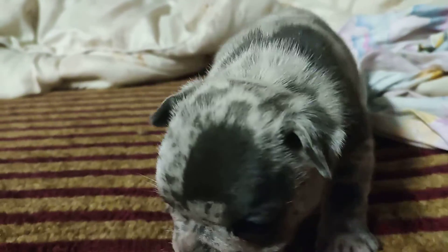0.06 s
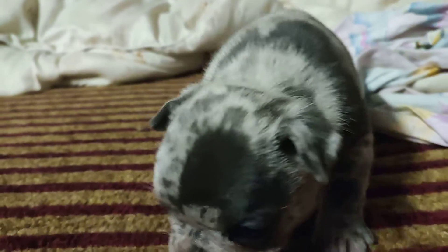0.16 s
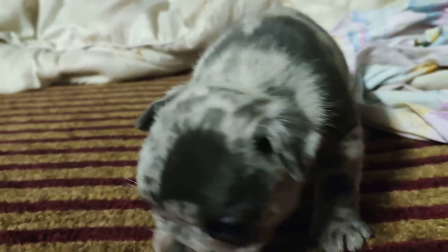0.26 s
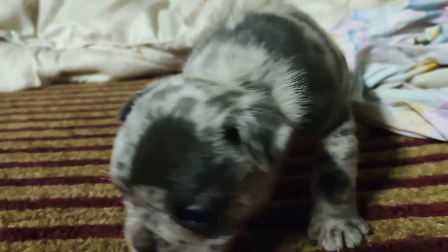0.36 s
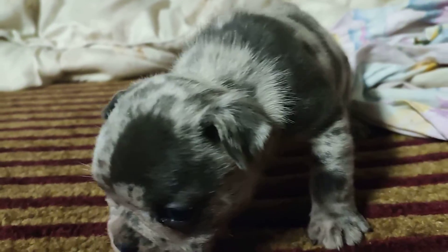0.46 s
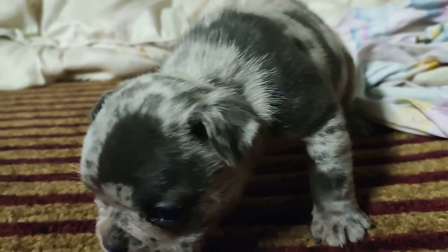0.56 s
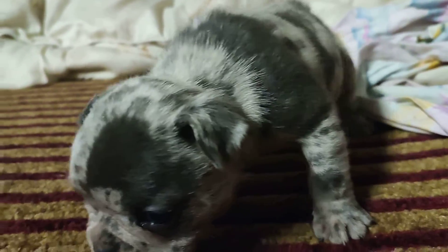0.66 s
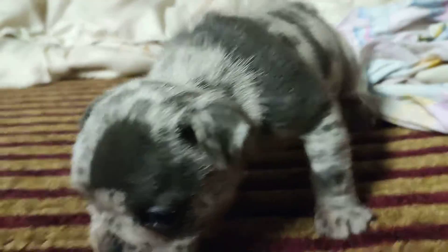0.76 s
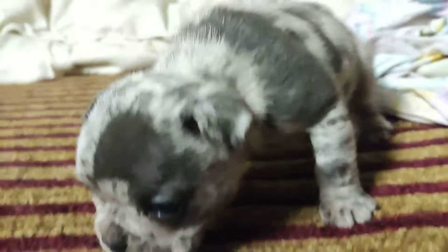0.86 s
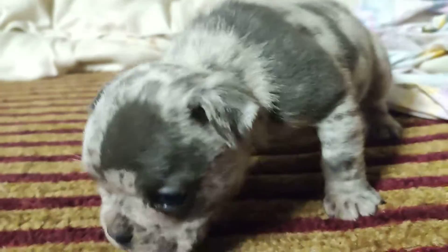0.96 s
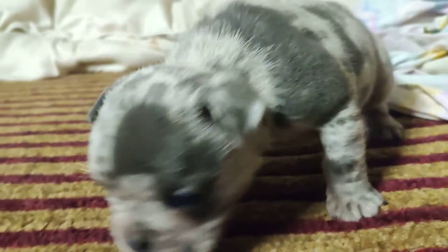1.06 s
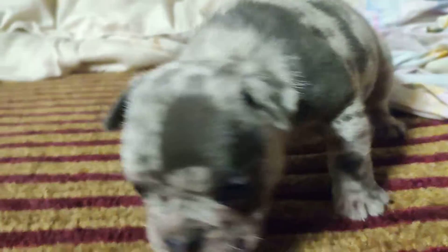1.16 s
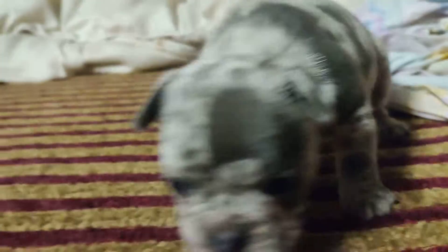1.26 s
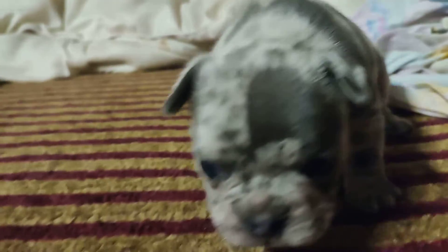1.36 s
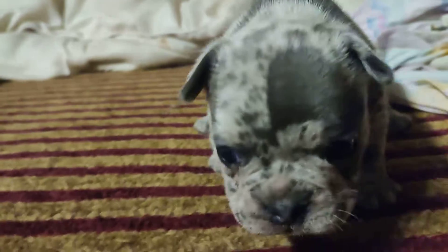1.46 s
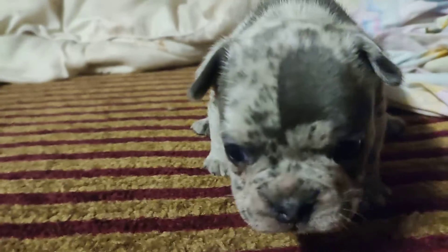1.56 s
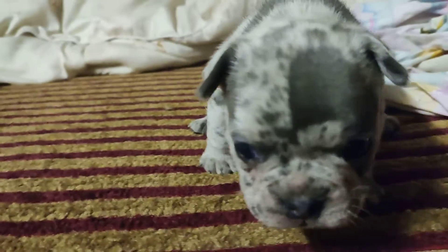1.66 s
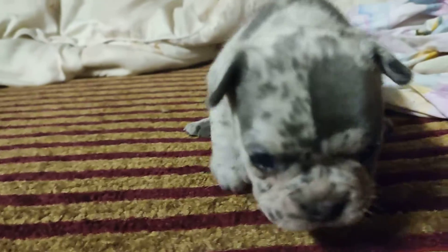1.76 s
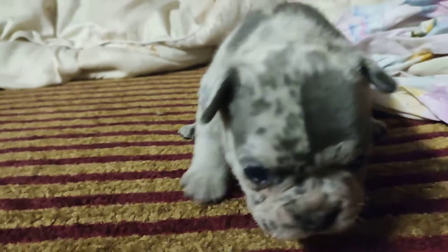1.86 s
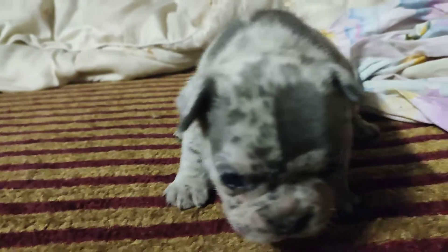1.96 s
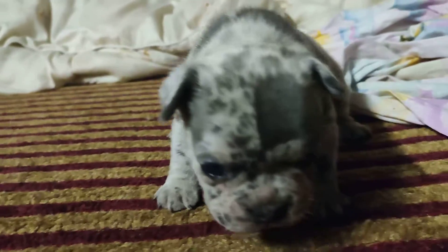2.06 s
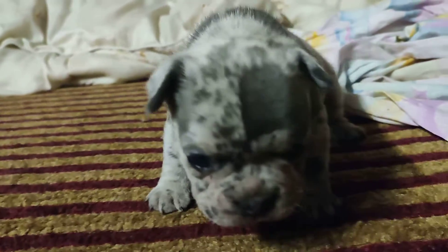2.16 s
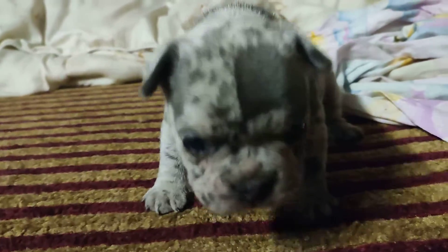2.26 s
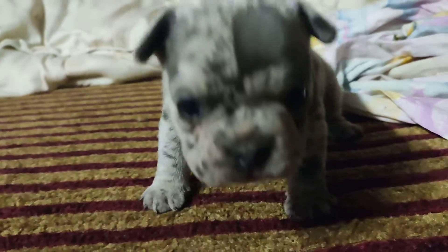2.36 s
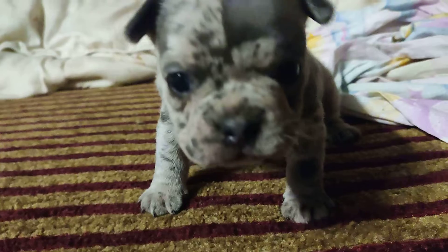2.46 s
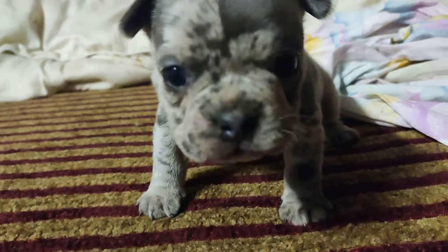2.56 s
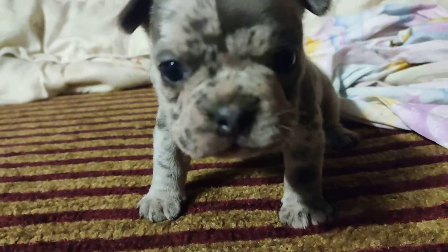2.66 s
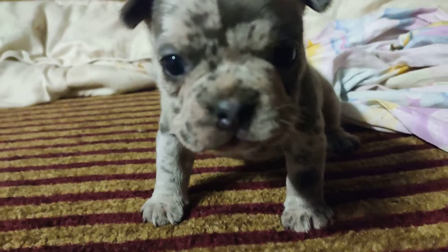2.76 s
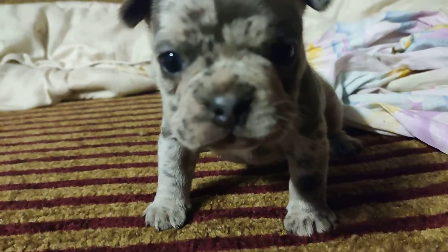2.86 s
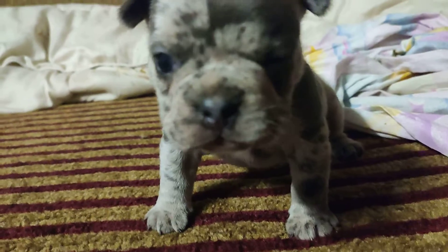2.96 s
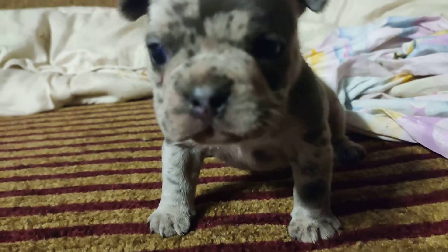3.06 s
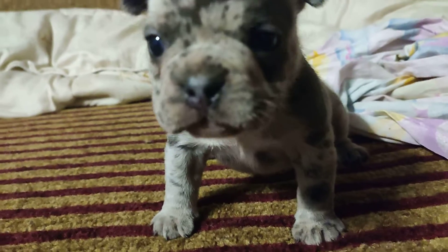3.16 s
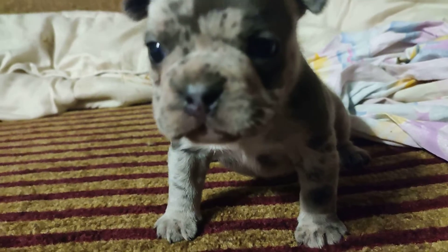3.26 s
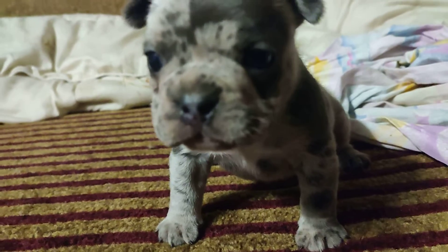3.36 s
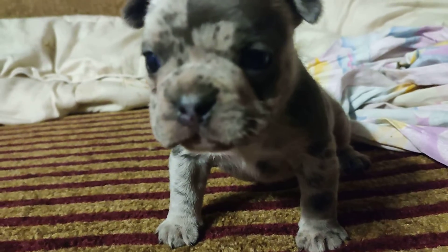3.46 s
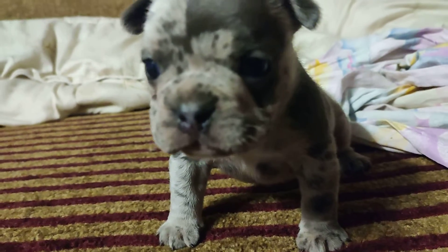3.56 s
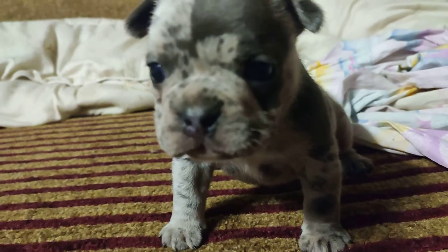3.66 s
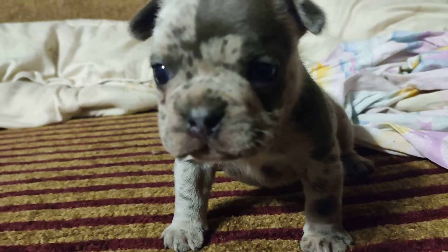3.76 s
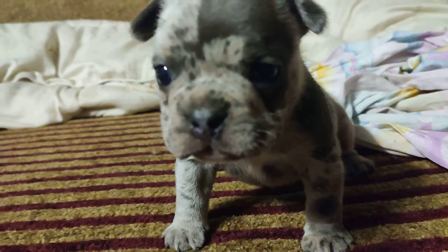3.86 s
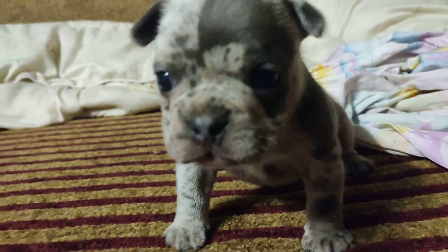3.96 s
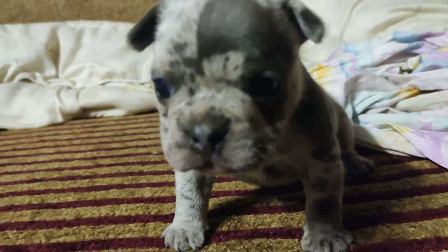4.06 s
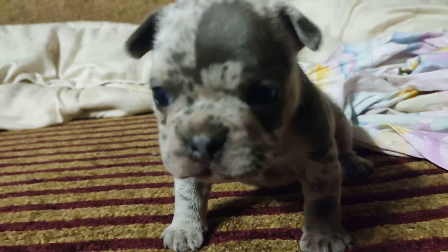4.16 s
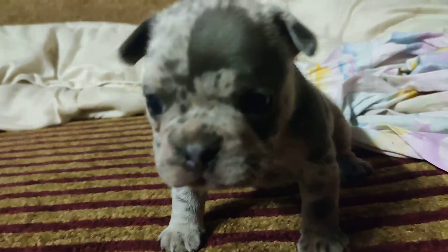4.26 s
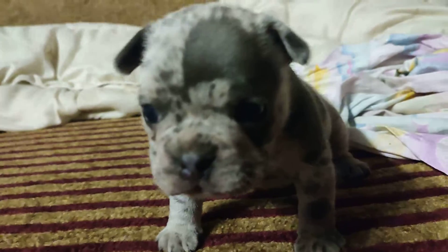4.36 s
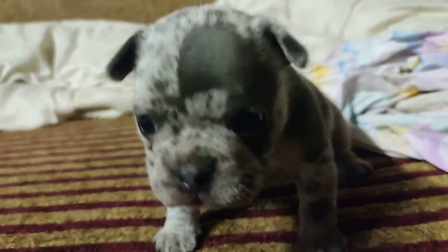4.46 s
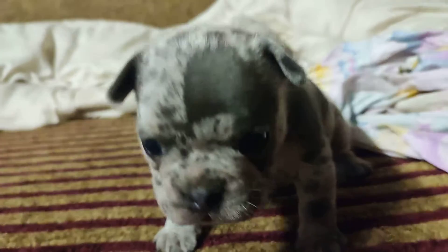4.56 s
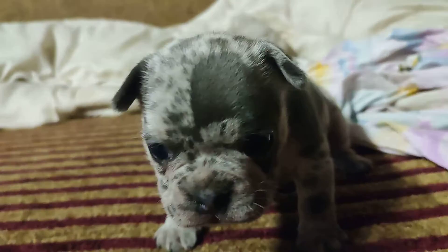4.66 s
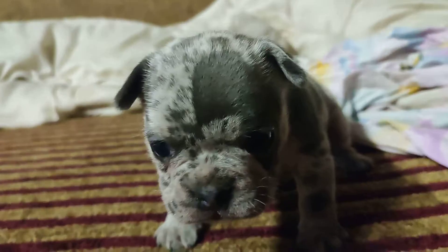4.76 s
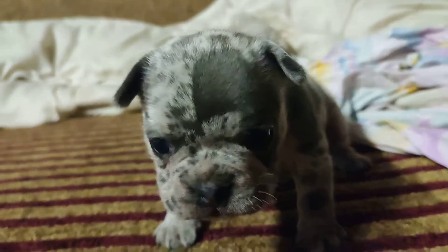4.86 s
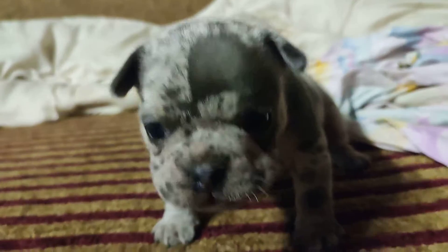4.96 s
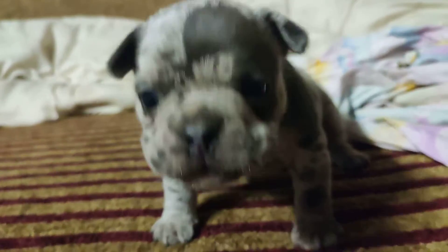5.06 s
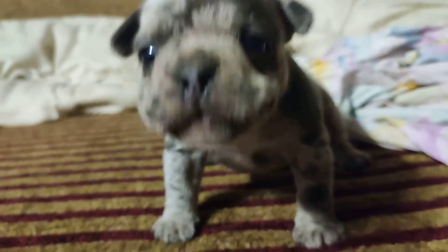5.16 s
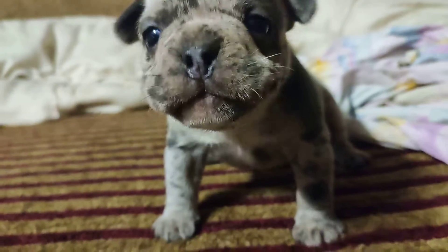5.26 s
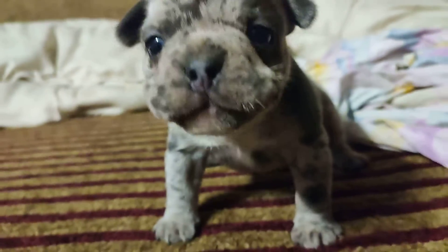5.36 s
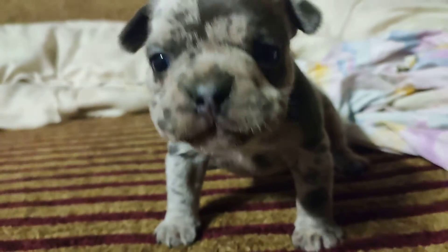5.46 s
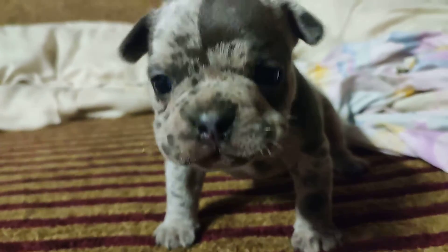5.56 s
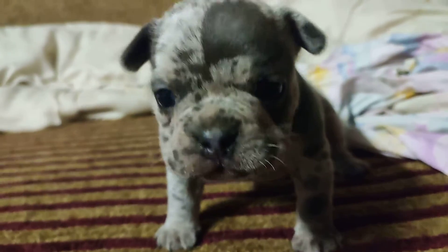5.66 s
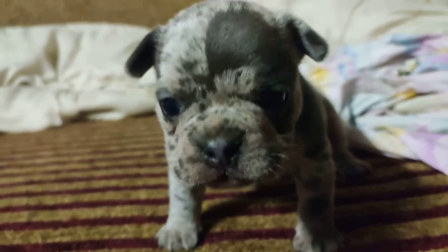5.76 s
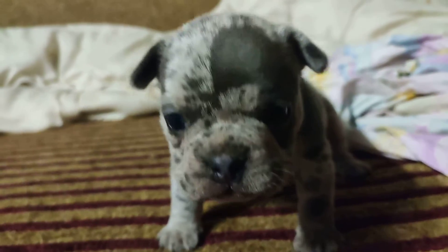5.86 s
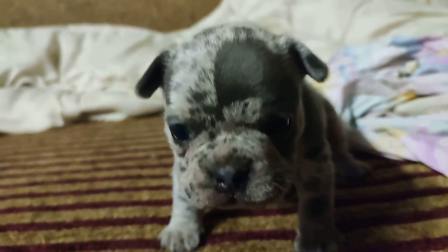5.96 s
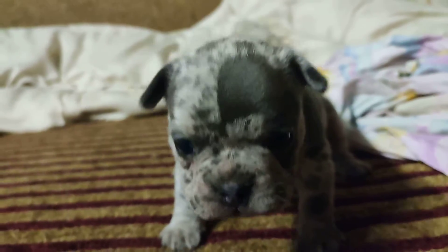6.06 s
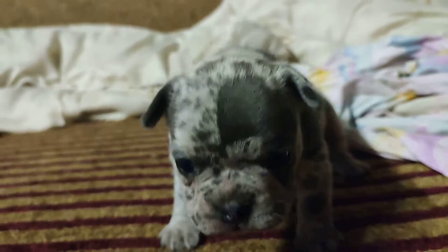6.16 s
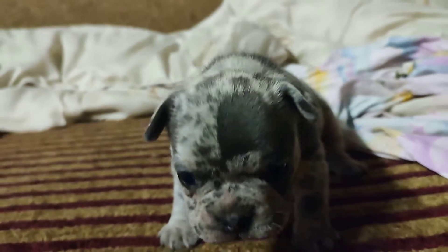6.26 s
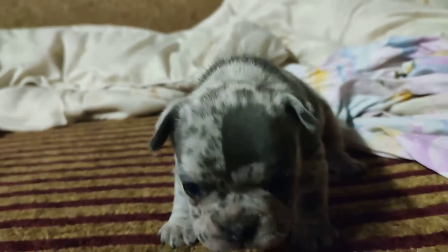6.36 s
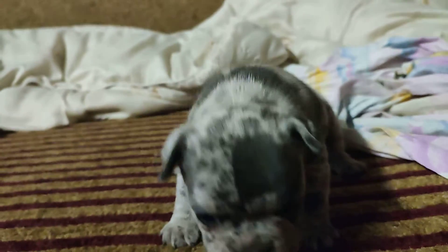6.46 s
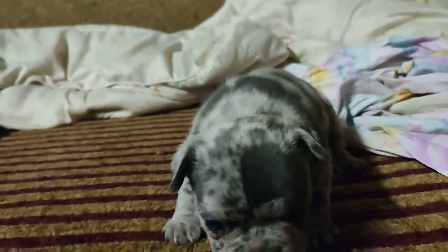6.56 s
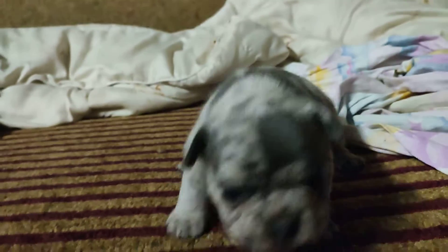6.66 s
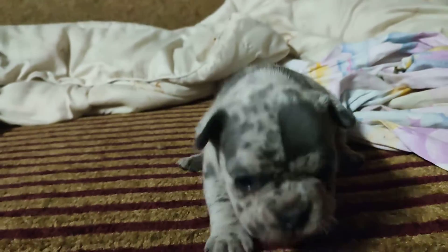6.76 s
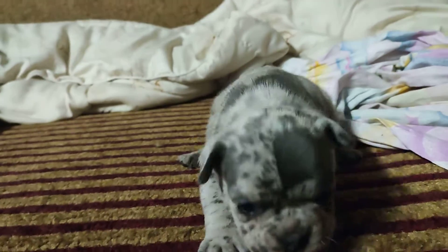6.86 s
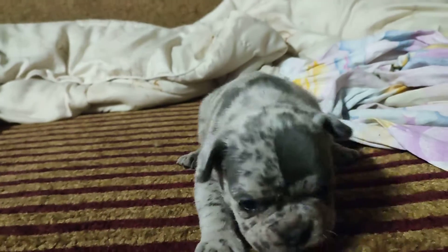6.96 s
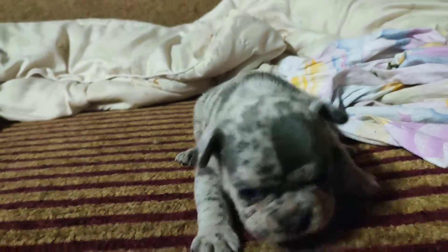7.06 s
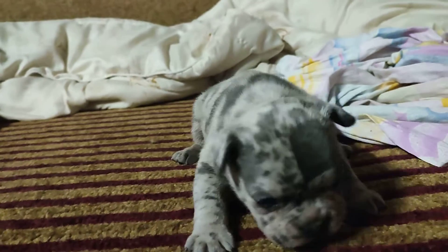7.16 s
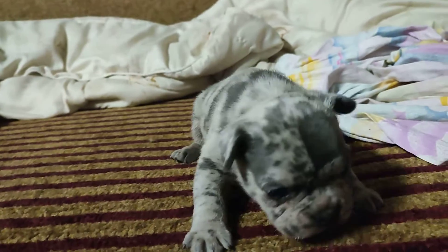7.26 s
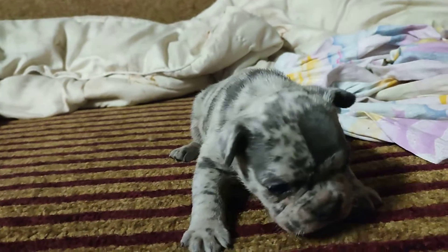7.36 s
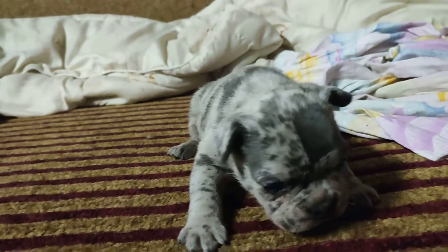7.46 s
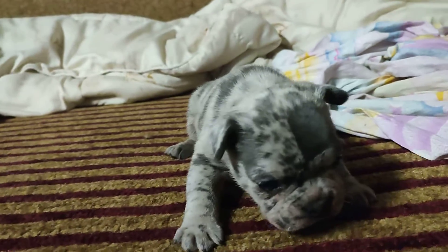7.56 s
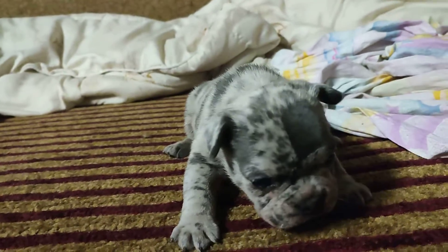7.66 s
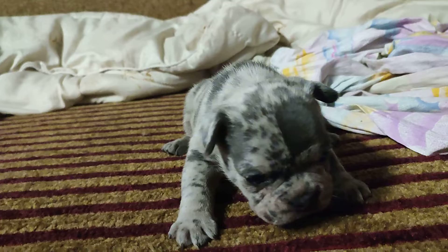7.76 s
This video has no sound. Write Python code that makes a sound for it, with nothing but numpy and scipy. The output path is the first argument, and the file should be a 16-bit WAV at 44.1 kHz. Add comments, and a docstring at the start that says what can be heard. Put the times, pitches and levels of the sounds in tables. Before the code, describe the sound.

A very young puppy is heard close up on a bed, in a quiet room with almost no echo. Faint hiss, low rumble and a slight hum run throughout. For the first two seconds it snuffles softly and makes tiny, short grunts. From about 2.5 to 3.2 seconds come a few brief squeaky yaps mixed with grunts and sniffs, then faint breaths and a tiny lip smack. Near 4.8 seconds a low creak rises into a long, loud squeal, peaking around 5.2 and sliding down to a raspy end by 5.7. At about 6.7 seconds a second cry, louder and shriller, leaps up, holds with a rasp, then falls away by 7.3. A small grunt and sniff follow at 7.5. Soft puffs of air thump the microphone on the right now and then, most densely between 6.2 and 6.6 seconds.

```python
"""Young puppy on a bed.

A very young puppy snuffles, grunts and gives two long squeaky cries close to a two-port microphone.
The voice is vocal fold pulses shaped by throat and mouth; snuffles are air noise in the nose.
Puffs of air thump on the right port over room hiss, a low rumble and a faint hum."""
import sys
import numpy as np
from scipy import signal
from scipy.fft import rfft, irfft
from scipy.io import wavfile
from scipy.ndimage import uniform_filter1d

SR = 44100
rng = np.random.default_rng(int(sys.argv[2]) if len(sys.argv) > 2 else 0)


def to_wav(s):
    """Save 16-bit WAV."""
    ch = np.atleast_2d(s).T  # columns
    pcm = np.round(np.clip(ch, -1, 1) * 32767)  # PCM
    wavfile.write(sys.argv[1], SR, pcm.astype(np.int16))


N = 344421
AIR_LEAK = 0.5  # thin hiss that always passes the folds


def gain_of(db):
    """Decibels to amplitude factor."""
    return 10 ** (np.asarray(db) / 20)


def unit_rms(x):
    """Scale to rms 1."""
    return x / np.sqrt(np.mean(x ** 2) + 1e-20)


def along(rows, t):
    """Interpolate each column of a curve at times t."""
    times_s, *columns = np.transpose(rows)
    return [np.interp(t, times_s, column) for column in columns]


def add(mix, start_s, sound):
    """Mix a sound in at start_s."""
    part = mix[..., round(start_s * SR):][..., :sound.shape[-1]]
    part += sound[..., :part.shape[-1]]


def coloured(x, spectrum, size=4096):
    """Minimum-phase filter from rows of freq_hz, gain_db."""
    freq_hz, gain_db = np.transpose(spectrum)
    bins_hz = abs(np.fft.fftfreq(size, 1 / SR))
    log_gain = np.interp(np.log(bins_hz + 1), np.log(freq_hz + 1), gain_db) * np.log(10) / 20
    phase = -signal.hilbert(log_gain).imag
    taps = np.fft.ifft(np.exp(log_gain + 1j * phase)).real[:size // 2]
    return signal.oaconvolve(x, taps)[:len(x)]


def filtered(x, edge_hz, kind="low", order=2):
    """Zero-phase Butterworth filter."""
    return signal.sosfiltfilt(signal.butter(order, edge_hz, kind, fs=SR, output="sos"), x)


def wobble(count, rate_hz):
    """Smooth random drift, rms 1."""
    spectrum = rfft(signal.detrend(rng.standard_normal(count), type="constant"))
    bins_hz = np.fft.rfftfreq(count, 1 / SR)
    return unit_rms(irfft(spectrum / (1 + (bins_hz / rate_hz) ** 2), count))


def background():
    """Independent hiss at each port, a lumpy, partly shared rumble and a wavering hum."""
    # freq_hz, gain_db
    hiss_colour = [(150, -25), (250, -4), (550, -5.5), (1400, -16), (2500, -10.5), (8500, -27),
                   (9500, -24.5), (14000, -25.5)]
    # freq_hz, gain_db
    rumble_colour = [(8.8, -39.5), (15, 9.5), (27, -1), (46, -6), (151, -21), (300, -32.5), (390, -52.5),
                     (660, -120)]
    # time_s, level_db
    rumble_curve = [(0.0, -55.5), (2.2, -54.5), (2.8, -60.5), (4.1, -55.5), (7.81, -50)]
    # pitch_hz, waver_hz, level_db
    hum_tones = [(201, 12, -75)]
    t = np.arange(N) / SR

    def noise(colour, waver_db, waver_hz):
        return unit_rms(coloured(rng.standard_normal(N), colour)) * gain_of(waver_db * wobble(N, waver_hz))

    hiss = gain_of(-71) * np.array([noise(hiss_colour, waver_db=0.62, waver_hz=2) for _ in range(2)])
    left, shared = (noise(rumble_colour, waver_db=3, waver_hz=30) for _ in range(2))
    rumble = gain_of(along(rumble_curve, t)[0]) * np.array([0.5 * left + 0.15 * shared, 1.62 * shared])
    hum = np.zeros(N)
    for pitch_hz, waver_hz, level_db in hum_tones:
        level = gain_of(level_db + 7.2 * wobble(N, waver_hz))
        hum += level * np.sin(2 * np.pi * pitch_hz * t + 1.3 * wobble(N, waver_hz))
    return hiss + rumble + hum


def mouth_opening(x, treble_db):
    """An open mouth lets out more treble."""
    low = filtered(x, edge_hz=3300, order=4)
    return low + gain_of(treble_db) * (x - low)


def at_ports(x, start_s):
    """Sound reaches the left port first; head direction sets balance and one delay per sound."""
    # time_s, left_lead_s, left_gain_db
    head = [(0, 0.00033, -3), (1.3, 0.00032, -1), (2.5, 0.00024, -2), (5.75, 0.00021, 4.5),
            (6.6, 0.00003, -1), (6.9, 0.000044, 6), (6.95, 0.00013, -1.5)]
    x = np.pad(x, (0, 64))
    lead_s, left_db = along(head, start_s + np.arange(len(x)) / SR)
    delay = np.exp(-2j * np.pi * np.fft.rfftfreq(len(x), 1 / SR) * lead_s.mean())
    return np.array([x * gain_of(left_db), irfft(rfft(x) * delay, len(x))])


def snuffles():
    """Air hisses through the nostrils; wet lips part with tiny smacks."""
    # start_s, length_s, relative_db
    breaths = [(0.024, 0.075, -65), (0.735, 0.14, -66), (0.929, 0.1, -61.5), (1.122, 0.11, -62),
               (1.741, 0.11, -63), (2.51, 0.039, -70), (2.759, 0.15, -52.5), (3.086, 0.16, -63.5),
               (3.466, 0.14, -69), (3.755, 0.23, -69), (7.453, 0.14, -69)]
    # start_s, relative_db
    lip_partings = [(0.1933, -69), (2.9545, -71.5), (4.0526, -71.5)]
    # freq_hz, gain_db
    nose = [(8500, -1), (11500, 16.5), (14000, -6)]
    # freq_hz, gain_db
    lips = [(2300, -9), (3500, 33), (5300, 28), (6500, 14)]
    rise_s, fade_s = 0.0004, 0.0022
    out, t = np.zeros((2, N)), np.arange(900) / SR
    snap = np.minimum(t / rise_s, 1) * np.exp(-t / fade_s)
    puffs = [(s, gain_of(db) * np.hanning(round(length_s * SR)), nose) for s, length_s, db in breaths]
    smacks = [(s, gain_of(db) * snap, lips) for s, db in lip_partings]
    for start_s, envelope, colour in puffs + smacks:
        air = gain_of(19) * envelope * coloured(rng.standard_normal(len(envelope)), colour)
        add(out, start_s, at_ports(mouth_opening(air, treble_db=16.7), start_s))
    return out


def bedroom_tail(x):
    """Bedding soaks up sound, leaving a short tail of sparse reflections."""
    rt60_s = 0.025
    taps = np.zeros((2, 12000))
    delays = np.arange(120, 11980, 20) + rng.integers(0, 20, (2, 593))
    np.put_along_axis(taps, delays, rng.choice([-1., 1.], delays.shape), 1)
    taps *= gain_of(-60 * np.arange(taps.shape[1]) / SR / rt60_s)
    return signal.oaconvolve(x, taps / np.linalg.norm(taps[0]), axes=1)[:, :N]


def thumps():
    """Air hits the right port: a pressure step, then the membrane swings back and settles."""
    # start_s, relative_db, swing_hz
    puffs = [(0.496, -38.5, 91), (0.698, -41.5, 71), (1.279, -40.5, 74.4), (2.219, -41, 82),
             (4.053, -37.5, 64), (4.634, -35, 66.4), (5.154, -39, 45), (6.181, -42.5, 75),
             (6.329, -35.5, 69), (6.491, -35.5, 75), (6.567, -34.5, 60.5), (6.637, -40, 90),
             (7.376, -46, 91)]
    out, t = np.zeros(N), np.arange(3000) / SR
    step = 0.5 * np.exp(-t / 0.0019) * np.minimum(t / 0.00045, 1)
    for start_s, relative_db, swing_hz in puffs:
        swing = 4.6 * np.sin(2 * np.pi * swing_hz * t) * np.exp(-t * swing_hz * 2.3)
        add(out, start_s, -gain_of(relative_db) * (step + swing))
    return out * np.array([[0.08], [1.5]])


def vocal_folds(pitch_hz, rough, flutter=0, cycles=1, leak=AIR_LEAK):
    """Fold pulses. Roughness shakes timing and strength and leaks air; flutter bunches every few."""
    count, top_hz = len(pitch_hz), 15000
    swell_db, swell_range_hz = 4, (4, 14)
    t = np.arange(count) / SR
    turns_per_sample = pitch_hz * np.exp(0.26 * rough * wobble(count, 110)) / SR
    flutter_rad = 2 * np.pi * np.cumsum(turns_per_sample / cycles * np.exp(0.08 * wobble(count, 40)))
    turns = rng.random() + np.cumsum(turns_per_sample)
    bunched = turns + 0.11 * flutter * np.sin(flutter_rad)  # stressed cycles run faster
    draws = rng.random((200, 2))
    pulses = np.zeros(count)
    for k in range(1, int(top_hz / pitch_hz.min())):
        swell_hz = np.interp(draws[k, 0], (0, 1), swell_range_hz)
        swell = (k > 2) * np.sin(2 * np.pi * (swell_hz * t + draws[k, 1]))  # each overtone on its own
        pulses += np.cos(2 * np.pi * k * bunched) * (k * pitch_hz < top_hz) * gain_of(swell_db * swell)
    pulses *= np.sqrt(2 * pitch_hz / 500) * np.exp(0.9 * rough * wobble(count, 130))
    air = (0.84 + 2 * np.exp(-(turns % 1) / 0.75)) * rng.standard_normal(count)
    stress = np.exp(flutter * np.cos(flutter_rad)) / np.sqrt(np.i0(2 * flutter))
    return (pulses + rough * air + leak * np.diff(air, prepend=0)) * stress


def chest_tone(x, share):
    """Add the low chest tone; a negative share thins it."""
    return x + share * filtered(x, edge_hz=550)


def grunts():
    """Short grunts and squeaky yaps; the chest tone drops out while the head is raised."""
    # start_s, length_s, effort_db, start_hz, end_hz, roughness
    pushes = [(0.787, 0.017, -45.5, 352, 383, 0.39), (0.97, 0.025, -43.5, 373, 360, 0.24),
              (1.161, 0.033, -45, 292, 323, 0.31), (1.38, 0.024, -52, 1706, 2030, 0.34),
              (1.8, 0.014, -47, 480, 463, 0.45), (2.506, 0.021, -37, 1037, 942, 0.1),
              (2.796, 0.05, -38.5, 1333, 978, 0.44), (2.835, 0.045, -34.5, 362.6, 343, 0.3),
              (3.133, 0.015, -34.5, 1395, 1230, 0.28), (3.146, 0.011, -33.5, 1486, 1165, 0.32),
              (3.161, 0.011, -32.5, 1454, 1310, 0.06), (3.167, .032, -40.5, 435, 301, 0.49),
              (3.52, 0.015, -48, 355, 329, 0.39), (3.886, 0.029, -50.5, 455, 428, 0.56),
              (6.641, 0.0085, -43, 1330, 1260, 0.32), (7.514, 0.025, -51, 503, 476, 0.42)]
    # freq_hz, gain_db
    grunt_colour = [(1000, 6.5), (1900, -4.5), (2800, 10), (3700, -8.5), (5000, -11), (6000, 0)]
    attack_s, head_up_s, head_down_s = 0.0021, 2.4, 3.4
    out = np.zeros((2, N))
    for start_s, length_s, effort_db, start_hz, end_hz, rough in pushes:
        progress = np.linspace(0, 1, round(length_s * SR))
        attack = np.minimum(progress * length_s / attack_s, 1)
        fade = np.sqrt(1 - progress ** 0.64) * np.minimum((1 - progress) * 3.2, 1)
        pitch_hz = start_hz + (end_hz - start_hz) * progress
        voice = vocal_folds(pitch_hz, rough) * gain_of(effort_db) * attack * fade
        voice = chest_tone(voice, -0.85 if head_up_s < start_s < head_down_s else 2.2)
        add(out, start_s, at_ports(coloured(voice, grunt_colour), start_s))
    return out


def creak(end_s, end_db, length_s):
    """Low creak rising into a cry, as rows of time_s, pitch_hz, effort_db."""
    low_hz, high_hz, start_db = 80.5, 263.2, -45.5
    progress = np.arange(8) / 8
    rise = np.sin(np.pi / 2 * progress)
    pitch_hz = low_hz * (high_hz / low_hz) ** rise
    effort_db = start_db + (end_db - start_db) * rise
    return list(zip(end_s - length_s * (1 - progress), pitch_hz, effort_db))


def voice_breaks(t):
    """The voice breaks into a rasp: roughness, flutter, cycles per flutter and jolt at times t."""
    # start_s, length_s, roughness, flutter_depth, cycles_per_flutter, jolt_db
    rasps = [(5.545, .075, .16, .8, 2, 0), (5.648, .015, .3, .7, 2, 0), (6.715, .202, .1, .65, 5, 8)]
    clear_rough, edge_s, jolt_s = 0.028, 0.012, 0.0035
    rough, flutter, cycles, jolt_db = clear_rough, 0, 1, 0
    for start_s, length_s, rasp_rough, depth, rasp_cycles, size_db in rasps:
        inside = np.clip(np.minimum(t - start_s, start_s + length_s - t) / edge_s + 0.5, 0, 1)
        rough += (rasp_rough - clear_rough) * inside
        flutter += depth * inside
        cycles = np.where(inside > 0, rasp_cycles, cycles)
        age = (t - start_s) / jolt_s - 0.5
        jolt_db += size_db * (np.exp(-age ** 2) - 2 * np.exp(-(age - 2) ** 2))  # jolt, then catch
    return rough, flutter, cycles, jolt_db


def cries():
    """Two squeals rise and fall; the mouth opens with pitch and half closes in a rasp."""
    # per cry: time_s, pitch_hz, effort_db
    cry_curves = [
        [(4.966, 535, -34.5), (5.034, 713, -34.5), (5.09, 773, -28.5), (5.145, 883, -22.5), (5.18, 1096, -20.5),
         (5.22, 1230, -18), (5.26, 1113, -22), (5.288, 872, -21.5), (5.315, 797, -22.5), (5.41, 680, -23.5),
         (5.5, 594.7, -27), (5.592, 433, -30), (5.648, 410, -35.5), (5.678, 339, -35), (5.738, 305, -35)],
        [(6.652, 898, -40), (6.668, 978.4, -28), (6.7, 1352, -12.5), (6.712, 1461, -18.5), (6.735, 1366, -12),
         (6.775, 1352, -18.5), (6.865, 1400, -15), (6.914, 1311, -18.5), (6.921, 1057, -24.5),
         (6.986, 912, -25.5), (7.016, 929, -21), (7.05, 841, -26.5), (7.066, 708, -22.5), (7.162, 582.6, -26),
         (7.186, 583, -25.5), (7.213, 490, -26.5), (7.262, 425, -28.5), (7.294, 478, -23)],
    ]
    # time_s, ring_db, bite_db, top_hiss_db
    mouth_shape = [(4.9, 0, 2, 13), (5.05, 3.5, -5, -8), (5.25, -7, -7, -12), (5.4, -10, -2, -5),
                   (5.6, -4.5, -0.5, 12.5), (6.66, 3.5, 13, 7.5), (6.705, 4, 23.5, 15), (6.75, -3, 17, -4),
                   (6.9, -5, 5.5, -5.5), (6.96, 5.5, 4.5, -10.5), (7.12, 0.5, 1.5, 3.5)]
    # ring, bite, top hiss: low_hz, high_hz
    mouth_bands = (2050, 3250), (3500, 5900), (9600, 14000)
    attack_s, release_s, release_db = 0.0013, 0.033, -29.5
    open_hz, treble_db_per_octave, rasp_treble_db = 750, 3.5, -10.5
    creak_s, creak_rough, creak_treble_db = 0.14, 0.36, -3
    first, second = cry_curves
    onset_s, _, onset_db = first[0]
    out = np.zeros((2, N))
    for curve in [creak(onset_s, onset_db, creak_s) + first, second]:
        t = np.arange(curve[0][0], curve[-1][0], 1 / SR)
        pitch_hz, effort_db = along(curve, t)
        pitch_hz = uniform_filter1d(pitch_hz, 300, mode="nearest")  # muscles round off corners
        rough, flutter, cycles, jolt_db = voice_breaks(t)
        bands_db = along(mouth_shape, t)
        bite_db = bands_db[1]
        creaking = np.clip((onset_s - t) / creak_s, 0, 1)
        rough += creak_rough * np.sqrt(creaking)
        attack = np.minimum((t - t[0]) / attack_s, 1)
        release = np.clip(1 - (t[-1] - t) / release_s, 0, 1)
        voice = vocal_folds(pitch_hz, rough, flutter, cycles, leak=AIR_LEAK * gain_of(bite_db / 2))
        voice *= gain_of(effort_db + jolt_db + release_db * release) * attack
        thinness = np.minimum(20 * creaking + 2 * flutter * (pitch_hz > open_hz), 1)  # creak, scream
        voice = chest_tone(voice, -0.9 * thinness)
        for band_hz, band_db in zip(mouth_bands, bands_db):
            voice += (gain_of(band_db) - 1) * filtered(voice, band_hz, "band")
        treble_db = treble_db_per_octave * np.log2(pitch_hz / open_hz)
        treble_db += rasp_treble_db * flutter - 0.45 * bite_db
        treble_db = np.where(creaking > 0, creak_treble_db, treble_db)
        voice = mouth_opening(voice, uniform_filter1d(treble_db, 400, mode="nearest"))
        add(out, t[0], at_ports(voice, t[0]))
    return out


def scene():
    """The puppy through its throat and the room, plus background and thumps."""
    # freq_hz, gain_db
    throat = [(500, -10.5), (1000, -1), (1400, -13.5), (1650, -7.5), (1840, 0.5), (2150, -2.5), (2700, -17),
              (3300, -24.5), (4400, -33), (5250, -44), (6200, -23.5), (8200, -21.5), (9000, -36),
              (10000, -50), (11800, -44.5), (14300, -56)]
    puppy = gain_of(-2.5) * np.array([coloured(x, throat) for x in cries() + grunts() + snuffles()])
    return puppy + gain_of(-8.5) * bedroom_tail(puppy) + background() + thumps()


def record(dry):
    """The right port rings in its small cavity; peaks round off, then the band is limited."""
    # freq_hz, gain_db
    right_port = [(100, -3.5), (900, 2), (1400, 9.5), (1750, 13.5), (2500, 4), (3800, 1), (6000, 13),
                  (7500, 4.5), (8500, -5.5), (10000, -4), (12500, 7)]
    cutoff_hz = 14400
    ports = np.array([dry[0], coloured(dry[1], right_port)])
    ports = 0.94 * np.tanh(ports + ports ** 3 / 3)
    lowpass = signal.firwin(511, cutoff_hz, window=("kaiser", 9), fs=SR)
    return signal.oaconvolve(ports, lowpass[None], "same")


dry = scene()
out = record(dry)
to_wav(out)
```